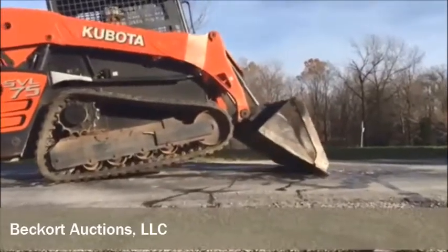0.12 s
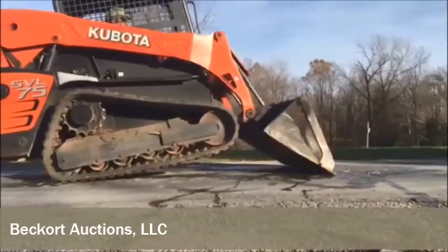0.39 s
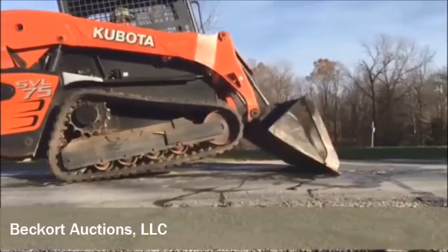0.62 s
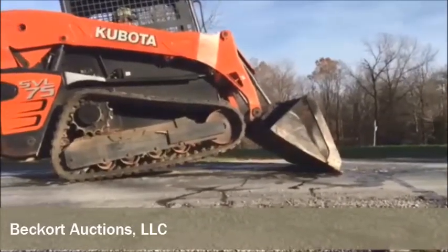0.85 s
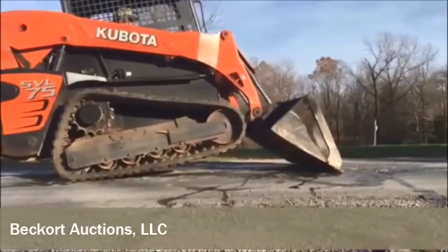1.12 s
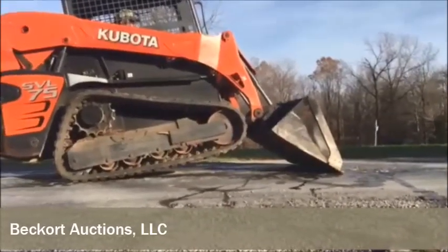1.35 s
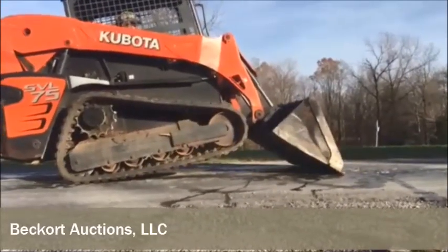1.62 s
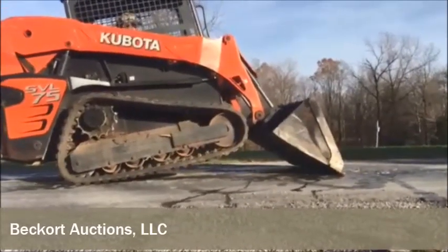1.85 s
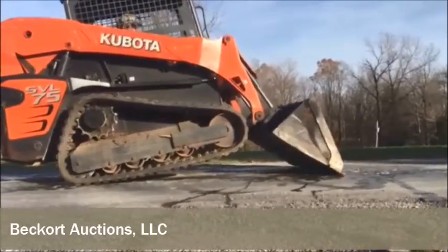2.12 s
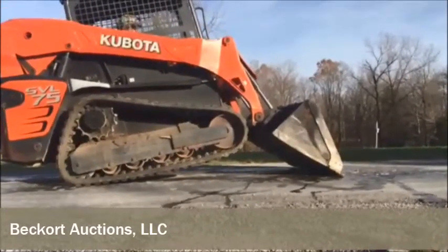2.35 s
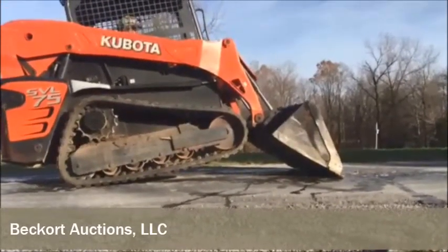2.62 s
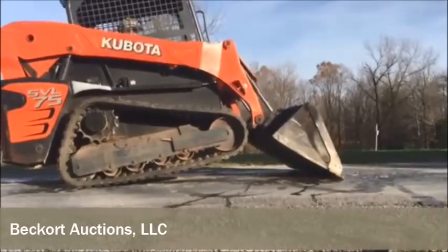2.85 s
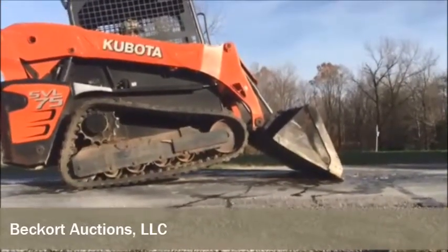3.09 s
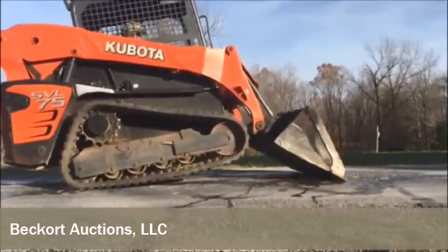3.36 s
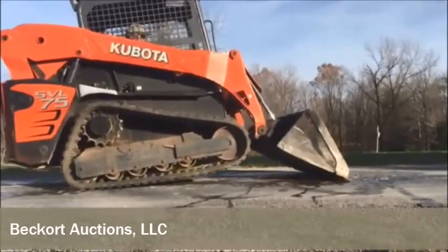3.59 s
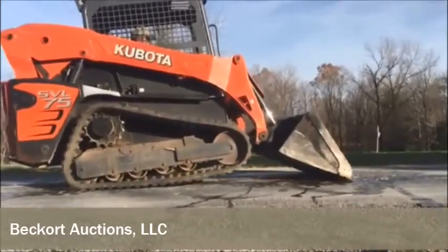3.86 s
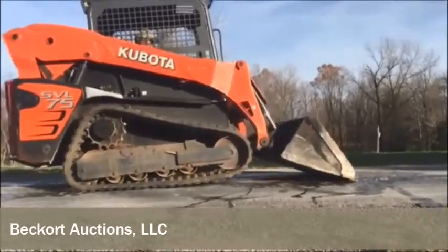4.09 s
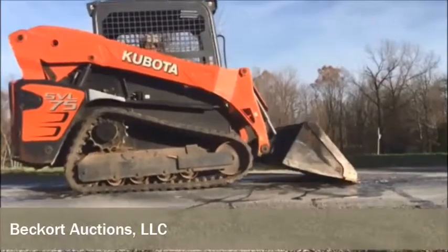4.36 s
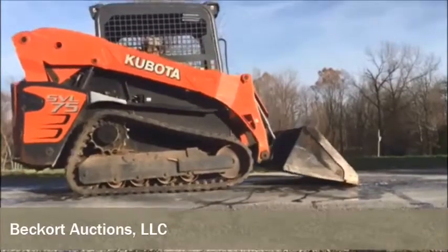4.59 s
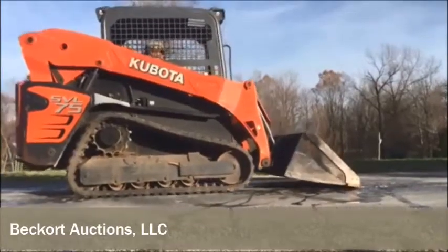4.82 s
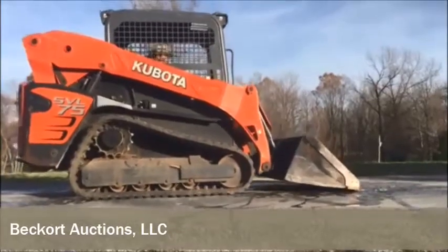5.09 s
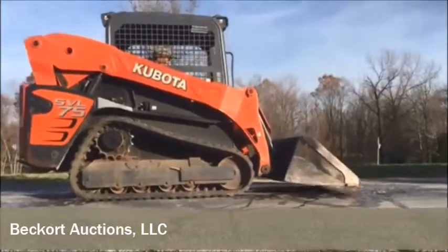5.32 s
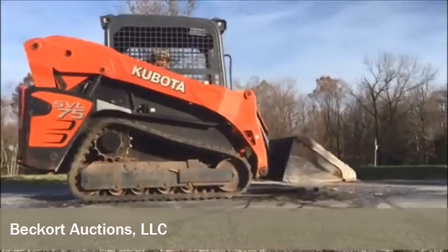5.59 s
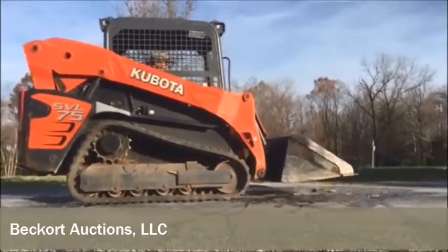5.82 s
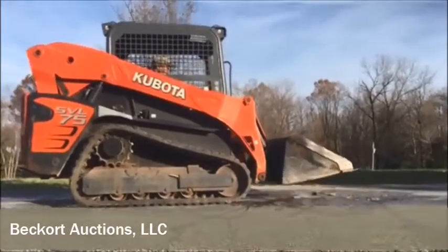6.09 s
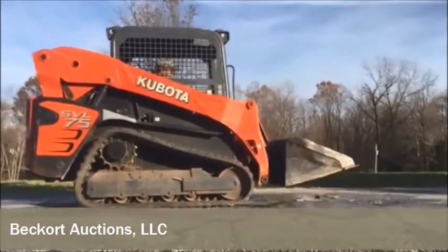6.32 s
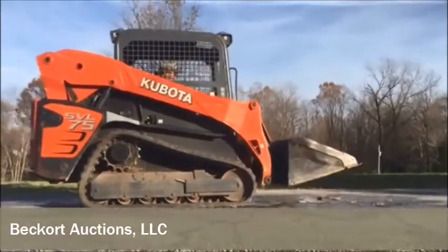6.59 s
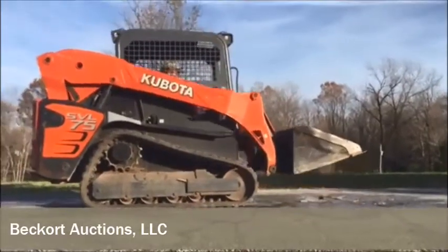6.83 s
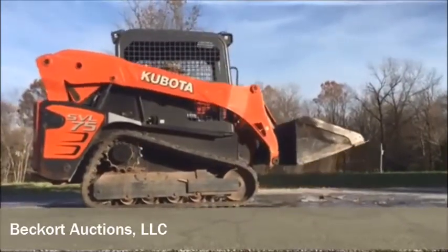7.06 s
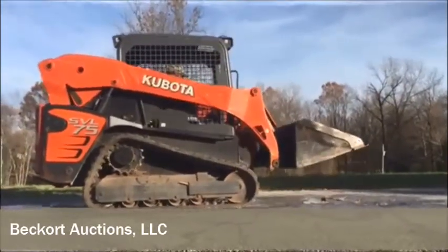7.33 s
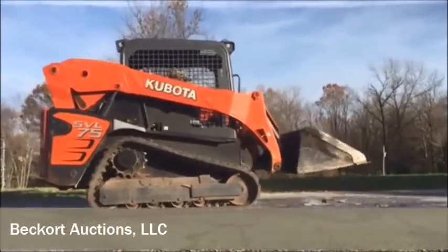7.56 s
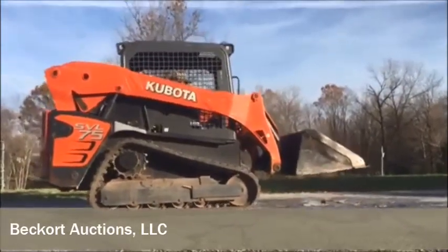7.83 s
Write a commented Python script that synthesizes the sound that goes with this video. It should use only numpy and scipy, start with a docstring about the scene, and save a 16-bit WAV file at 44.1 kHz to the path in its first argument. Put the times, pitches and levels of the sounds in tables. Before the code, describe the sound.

A compact tracked loader stands on open pavement, heard dry from a few metres through a small microphone. From 0 to 8 seconds its four-cylinder diesel runs at steady throttle: a low, slightly uneven throb around 70 firings per second, with fan tones, broad airy roar, pulsing combustion rattle and a faint, fluttering turbo whistle near 15 kHz. From about 2.6 seconds, hydraulic oil starts hissing softly, growing over a second, its bright singing colour shifting as the raised front lowers. At 3.5 seconds the bucket linkage clanks loudly, two or three blows almost together, followed by scraping, short-ringing steel knocks until about 4.2. The hiss continues until 6.5 and snaps shut. Thin, high oil spurts come at 6.6-6.8 and 6.9-7.2, then a tiny one near 7.45. The exhaust grows slightly softer after 4.5; engine pitch dips slightly near 7, then recovers, still running at the end.

```python
"""A paved yard, one small microphone a few metres from a four-cylinder diesel loader at steady throttle.
Exhaust multiples of the firing rate, fan shaft tones, a noise roar and a chopped turbo whistle run throughout.
Oil hisses as filtered noise through the valves while the arms lower the machine and lift the bucket,
whose steel linkage clanks as its load comes off: short noise scrapes that ring decaying modes."""
import sys
import numpy as np
from scipy import signal
from scipy.fft import rfft, irfft
from scipy.io import wavfile
from scipy.ndimage import uniform_filter1d, map_coordinates

SR = 44100
rng = np.random.default_rng(int(sys.argv[2]) if len(sys.argv) > 2 else 0)


def wav_out(sig):
    """Save sig, one row per channel (or a flat mono array), as 16-bit PCM at SR to the path in sys.argv[1]."""
    wavfile.write(sys.argv[1], SR, np.round(np.clip(np.atleast_2d(sig).T, -1, 1) * 32767).astype(np.int16))


def nominal_scale(level):
    """Amplitude ratio for a level in decibels (scalar or array-like)."""
    x = np.asarray(level, float) / 20
    return 10 ** x


N = 350154
T = np.arange(N) / SR


def evened(x):
    """Scales to rms 1."""
    return x / np.sqrt(np.mean(x ** 2) + 1e-20)


def curves(rows):
    """Every column of a table after the time, interpolated sample by sample."""
    s, *columns = np.transpose(rows)
    return [np.interp(T, s, column) for column in columns]


def drift(hz):
    """Slow chance of rms 1, up to about hz."""
    knots = rng.standard_normal(4000)
    return evened(map_coordinates(knots, [T * hz * 2], order=3))


def humps(peaks, hz):
    """Summed gain of resonances, each 3 dB down half a width from its centre."""
    return sum(nominal_scale(db) / np.sqrt(1 + (2 * (hz - f) / width) ** 4) for f, width, db in peaks)


def noise(shape, patchy_db):
    """Random short-time spectra times shape(hz, s), in patches that come and go."""
    real, imaginary, patches = rng.standard_normal((N // 256 + 5, 513, 3)).T
    patches = uniform_filter1d(patches, size=12, axis=0)  # over frequency
    patches = evened(uniform_filter1d(patches, size=8, axis=1))  # over time
    hz = np.fft.rfftfreq(1024, 1 / SR)[:, None]
    s = np.arange(real.shape[1]) * 256 / SR
    spectra = (real + 1j * imaginary) * nominal_scale(patchy_db * patches) * shape(hz, s)
    return signal.istft(spectra, nperseg=1024, noverlap=768)[1][:N]


# engine running: (time [s], firing rate [Hz], exhaust level [dB])
ENGINE_COURSE = [(0, 70.2, -17.5), (0.45, 70.5, -17.7), (1.35, 70.43, -17.3), (2.25, 70.4, -17.6),
                 (2.55, 70.56, -17.2), (2.85, 69.96, -17.8), (3.45, 69.56, -17.5), (4.2, 69.52, -17.5),
                 (4.8, 69.18, -18.9), (5.55, 68.77, -19.0), (6.45, 68.93, -19.6), (6.75, 68.85, -20.4),
                 (7.05, 67.71, -20.9), (7.35, 70.21, -19.9), (7.65, 69.84, -19.3), (7.94, 70.0, -19.2)]


def engine_course():
    """Running count of firings, the integral of their rate, and the exhaust level in dB."""
    rate_hz, level_db = curves(ENGINE_COURSE)
    return np.cumsum(rate_hz) / SR + 0.2005, level_db


# strength of each cylinder in firing order: (strength [dB, before each caller's scaling])
CYLINDER_STRENGTH = [-1.8, -2.5, -1.7, -0.32]


def throb(firings, late, spread):
    """Swell once a firing, uneven by cylinder and by chance; callers scale it to dB."""
    cycle = np.floor(firings - late).astype(int) + 2
    strength = np.take(CYLINDER_STRENGTH, cycle % 4) + spread * rng.standard_normal(800)[cycle]
    swell = -np.cos(2 * np.pi * (firings - late))
    return swell + uniform_filter1d(strength, size=200)  # softens the step between cylinders


# multiples 1, 2, 3 .. of the firing rate, four of exhaust note, then block knock: (relative level [dB])
FIRING_MULTIPLES = [0, -10.5, -23.5, -25.5, -37.5, -25, -22, -28, -25, -27.5, -38, -32.5, -32, -25.5, -26,
                    -30, -27, -25.5, -42, -40, -60, -44, -26, -46]


def exhaust(firings, level_db):
    """Clean multiples of the firing rate; the low four nearly in step, which makes a peaked pulse."""
    k = np.arange(1, len(FIRING_MULTIPLES) + 1)
    phase = np.where(k < 5, .42 * (k - 1), rng.uniform(0, 2 * np.pi, len(k)))

    def tone(i):
        return nominal_scale(FIRING_MULTIPLES[i]) * np.cos(2 * np.pi * k[i] * firings + phase[i])

    note = sum(tone(i) for i in range(4))
    knock = sum(tone(i) for i in range(4, len(k)))
    knock *= nominal_scale(0.57 * throb(firings, late=0.19, spread=0.0))
    return np.sqrt(2) * (nominal_scale(level_db + 0.24 * drift(hz=8)) * note + nominal_scale(-20.5) * knock)


# multiples 1, 2, 3 .. of the fan shaft, seven uneven blades: (rms level [dB])
FAN_MULTIPLES = [-51, -38.5, -45.5, -35.5, -31.5, -46, -31, -46, -45, -45, -49.5, -48, -54, -44, -48.5,
                 -45.5, -46]
FAN_TURNS_PER_FIRING = .4505


def fan(firings):
    """Shaft multiples of the belt-driven fan, each wavering in the turbulent inflow."""
    turns = FAN_TURNS_PER_FIRING * firings
    out = 0
    for k, db in enumerate(FAN_MULTIPLES):
        waver_db = (1.25 + 0.089 * k) * drift(hz=4)
        tone = np.cos(2 * np.pi * ((k + 1) * turns + rng.random()))
        out = out + np.sqrt(2) * nominal_scale(db + waver_db) * tone
    return out


# rush of fan air, intake and panels: (frequency [Hz], relative density [dB per Hz])
ROAR_COLOUR = [(20, -38), (35, -27), (55, -8.5), (100, -6.5), (140, 3), (200, -6), (350, -11), (520, -12.5),
               (680, -16.5), (1500, -20.5), (2800, -31), (5000, -41.5), (8000, -46.5), (13000, -50.5),
               (15000, -52), (16000, -54)]
# panel resonances in that rush: (frequency [Hz], width [Hz], gain [dB, before the panel share])
PANEL_RESONANCES = [(445, 98, 0.66), (536, 50, 4.6), (833, 117, 6.5), (1090, 104, 1.3), (1600, 330, 0.92),
                    (4270, 830, 1), (5470, 190, 12), (6240, 610, 14), (7110, 390, 3), (8570, 780, 3.9),
                    (9400, 500, 2.6), (11500, 1000, 7)]
ROAR_DB, PANEL_SHARE = -24, 0.36


def roar(firings, low_db, mid_db):
    """Wide rush of coloured noise; its treble is combustion rattle that pulses with the firings."""
    f, db = np.transpose(ROAR_COLOUR)
    hz = np.fft.rfftfreq(N, 1 / SR) + 1
    colour = nominal_scale(np.interp(np.log(hz), np.log(f), db)) * (1 + humps(PANEL_RESONANCES, hz) * PANEL_SHARE)
    rush = noise(lambda hz, s: 1, patchy_db=0.64)
    spectrum = rfft(evened(irfft(rfft(rush) * colour, N)))
    low_share = 1 / (1 + (hz / 650) ** 4)
    high_share = 1 / (1 + (2400 / hz) ** 4)
    low = irfft(spectrum * low_share, N)
    mid = irfft(spectrum * (1 - low_share - high_share), N)
    rattle = irfft(spectrum * high_share, N)
    pulse_db = 1.07 * throb(firings, late=0.22, spread=0.38) + 0.12 * drift(hz=9)
    return nominal_scale(ROAR_DB) * (nominal_scale(low_db) * low + nominal_scale(mid_db + 0.21 * pulse_db) * mid + nominal_scale(pulse_db) * rattle)


# turbo: (time [s], whistle frequency [Hz], level [dB])
TURBO_COURSE = [(0, 15100, -57), (.3, 14880, -59), (.6, 14760, -59), (2.7, 14780, -58), (3.1, 14940, -57),
                (3.4, 15110, -54), (3.7, 15310, -64), (4.1, 15430, -62), (5.6, 15620, -61),
                (6.2, 15900, -60), (6.9, 15740, -62), (7.35, 15750, -74), (7.47, 15520, -68),
                (7.56, 15420, -58), (7.7, 15380, -55), (7.94, 15130, -57)]
# a low whistle is chopped hard into widely spread sidebands; as it climbs it steadies
LOW_WHISTLE_HZ, LOW_SPREAD_HZ, STEADY_SPREAD_HZ, STEADYING_HZ = 14760, 140, 40, 350
WANDER = .6  # wandering of the loudest sideband, as a share of the extra spread


def turbo(firings):
    """Blade whistle chopped by the exhaust pulses: sidebands one firing rate apart, the loudest wandering."""
    hz, level_db = curves(TURBO_COURSE)
    chopping = np.exp((LOW_WHISTLE_HZ - hz) / STEADYING_HZ)
    spread_hz = STEADY_SPREAD_HZ + (LOW_SPREAD_HZ - STEADY_SPREAD_HZ) * chopping
    shift_hz = WANDER * (spread_hz - STEADY_SPREAD_HZ) * drift(hz=.7)
    turns = np.cumsum(hz + 4 * drift(hz=10) + 24 * drift(hz=120)) / SR
    out = 0
    for k in range(-4, 5):
        # sidebands weighted as if 70 Hz apart, near the firing rate
        weight_db = -6.1 * ((k * 70 - shift_hz) / spread_hz) ** 2 + 3.2 * drift(hz=25)
        line = np.sin(2 * np.pi * (turns + k * firings + .3 * drift(hz=6)))
        out = out + nominal_scale(weight_db) * line
    return nominal_scale(level_db) * out / np.sqrt(spread_hz / 70)  # a wider spread gets no louder


# time from its loudest for a 9600 Hz pipe to fall 7.9 dB; higher pipes sing for a shorter span
SONG_S_AT_9600_HZ, SONG_SHORTENING = 1.2, 0.86


def singing(pipes, hiss_db, hz, s):
    """Wide hiss plus each pipe resonance swelling and fading at its own time."""
    now = []
    for f, width, db, loudest_s in pipes:
        away = (s - loudest_s) / SONG_S_AT_9600_HZ * (f / 9600.0) ** SONG_SHORTENING
        now.append((f, width, db - 7.9 * away ** 2))
    return humps(now, hz) + nominal_scale(hiss_db) / np.sqrt(1 + (4500 / (hz + 1)) ** 4)


def strokes(rows, open_s, shut_db_per_s):
    """Gain of a valve that opens over open_s and dies away once shut."""
    out = 0
    for start, shut, db in rows:
        opening = np.clip((T - start) / open_s, 0, 1)
        out = out + nominal_scale(db - shut_db_per_s * np.maximum(T - shut, 0)) * opening
    return out


def oil_jet(pipes, hiss_db, flow):
    """Turbulent oil hisses through its pipes and flutters; hiss_db is the wide hiss under the pipes."""
    jet = evened(noise(lambda hz, s: singing(pipes, hiss_db, hz, s), patchy_db=1.0))
    return flow * nominal_scale(0.22 * drift(hz=12) + 0.45 * drift(hz=39)) * jet


# pipes that sing in turn as the load shifts:
# (frequency [Hz], width [Hz], relative level [dB], loudest at [s])
LOWERING_PIPES = [(3500, 360, 2.5, 8.4), (4420, 460, 1.5, 4.5), (5600, 280, 1, 5.1), (6250, 240, 4.5, 3.9),
                  (7120, 260, 4, 4.74), (8530, 190, 1, 5.6), (9880, 210, -2, 5.4), (10900, 170, -3, 5.8),
                  (11430, 240, -0.5, 4.47), (11650, 250, -3, 6), (12000, 300, 2, 2.7),
                  (12900, 220, -10, 5.7), (13900, 200, -15, 5.2)]
# strokes of the lowering valve: (opens at [s], shuts at [s], flow gain [dB])
LOWERING_STROKES = [(2.6, 6.47, -46), (4.9, 6.5, -59.5)]


def lowering_valve():
    """Oil throttled out of the arms: the valve creeps open and snaps shut."""
    flow = strokes(LOWERING_STROKES, open_s=0.96, shut_db_per_s=90)
    return oil_jet(LOWERING_PIPES, hiss_db=-7, flow=flow)


# blows: (time [s], ring peak [dB], pitch struck hardest [Hz], scrape decay [s],
# grit rms before its envelope [dB])
CLANK_BLOWS = [(3.473, -30, 600, 0.015, -35), (3.513, -10, 564, 0.0047, -23.5),
               (3.524, -7.5, 400, 0.0105, -29), (3.553, -15, 1250, 0.0097, -29),
               (3.579, -44, 1500, 0.0095, -34), (3.607, -28, 1600, 0.007, -28),
               (3.621, -19, 700, 0.0051, -35), (3.63, -38, 1300, 0.011, -36),
               (3.669, -16, 1360, 0.024, -33.5), (3.687, -30, 1300, 0.018, -29),
               (3.747, -16, 1200, 0.016, -33), (3.785, -24, 1450, 0.026, -36),
               (3.885, -19.5, 1300, 0.01, -38), (4.035, -17.5, 1090, 0.012, -30),
               (4.075, -24, 1300, 0.011, -37), (4.114, -19, 1110, 0.019, -32.5)]
# bucket and linkage modes: (frequency [Hz], relative level [dB], time to fall 60 dB [s])
BUCKET_MODES = [(190, 12, .12), (303, -1.5, 0.073), (448, -8, 0.069), (580, 0, 0.054), (642, 2, 0.068),
                (750, -1, 0.051), (922, -1, 0.16), (990, -2, .07), (1105, 2, 0.078), (1277, -4, 0.096),
                (1388, -3, 0.069), (1454, -2, 0.048), (1625, -3, 0.056), (1760, -1, 0.087)]
# a longer scrape excites a narrower band
GRIT_HZ, OCTAVES_AT_10_MS, NARROWING, RING_SHARE_OF_BREADTH = 3150, 0.7, 0.99, 0.93


def clanks():
    """Each blow is a short scrape: it rings the bucket modes near the spot and throws a gritty crack."""
    out, t = np.zeros(N), np.arange(12000) / SR
    hz, mode_db, t60 = np.transpose(BUCKET_MODES)[:, :, None]
    rings = nominal_scale(mode_db - 60 * t / t60) * np.sin(2 * np.pi * hz * t)
    wide_hz = np.fft.rfftfreq(len(t), 1 / SR) + 1
    for row, grit in zip(CLANK_BLOWS, rng.standard_normal((len(CLANK_BLOWS), len(t)))):
        s, ring_db, struck_hz, length, grit_db = row
        octaves = OCTAVES_AT_10_MS * (length * 100) ** -NARROWING
        scrape = np.exp(-t / length) * (1 - np.exp(-t / (12 * length ** 2)))  # long scrapes start softly
        near = nominal_scale(-6.1 * (np.log2(hz / struck_hz) / (RING_SHARE_OF_BREADTH * octaves)) ** 2)
        push = grit * scrape ** 2
        push = push / np.linalg.norm(push)
        push[20] -= .5 * octaves ** 2  # a broad blow lands with one hard contact
        ring = signal.fftconvolve((near * rings).sum(0), push)[:len(t)]
        band = nominal_scale(-6.1 * (np.log2(wide_hz / GRIT_HZ) / octaves) ** 2)
        # loose pins rattle on after the crack
        rattle = 0.11 * np.exp(-t / 0.048) * np.tanh(t / 0.0078)
        crack = evened(irfft(rfft(grit) * band)) * (scrape + rattle)
        blow = nominal_scale(ring_db) * ring / np.abs(ring).max() + nominal_scale(grit_db) * crack
        part = out[round(s * SR):][:len(t)]
        part += blow[:len(part)]
    return out


# pipes of the tilt valve: (frequency [Hz], width [Hz], relative level [dB], loudest at [s])
TILT_PIPES = [(8700, 300, -9, 7.05), (9400, 410, -4, 6.9), (9900, 270, -10, 7.1), (11300, 410, -8, 7.05),
              (13400, 200, -7, 7.01), (13750, 200, -4, 6.6), (14200, 300, -10, 7.1), (15600, 400, -4, 6.2)]
# short jabs on the lever: (opens at [s], shuts at [s], flow gain [dB])
TILT_JABS = [(6.61, 6.84, -50.5), (6.88, 7.17, -47.5), (7.44, 7.48, -50)]


def tilt_valve():
    """Oil spurts through the tilt valve, which opens and shuts faster than the lowering valve."""
    flow = strokes(TILT_JABS, open_s=0.055, shut_db_per_s=150)
    return oil_jet(TILT_PIPES, hiss_db=-10, flow=flow)


def scene():
    """All sources add up at one microphone."""
    firings, level_db = engine_course()
    engine = exhaust(firings, level_db) + fan(firings)
    # levels of the roar below about 650 Hz, and from there to about 2400 Hz
    engine = engine + roar(firings, low_db=0.08, mid_db=.3)
    engine = engine + turbo(firings)
    return (engine + lowering_valve() + clanks() + tilt_valve())[None]


def roll_off(x):
    """The treble ends steeply here."""
    return signal.sosfilt(signal.butter(12, 15920, fs=SR, output="sos"), x)


def record(dry):
    """The small microphone loses the deepest bass; a steep low-pass then limits the band."""
    bass_cut = signal.butter(2, 28, "high", fs=SR, output="sos")
    miked = signal.sosfilt(bass_cut, dry)
    edge = signal.firwin(1023, 15740, window=("kaiser", 9), fs=SR)
    mix = signal.oaconvolve(miked, edge[None], "same")
    return roll_off(mix)


dry = scene()
out = record(dry)
wav_out(out)
```